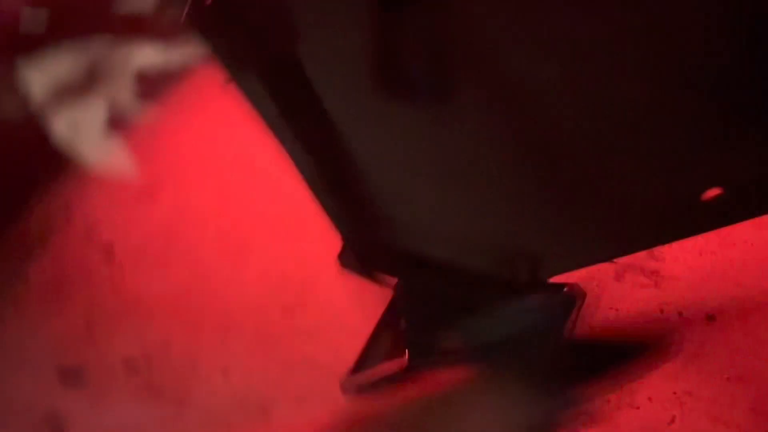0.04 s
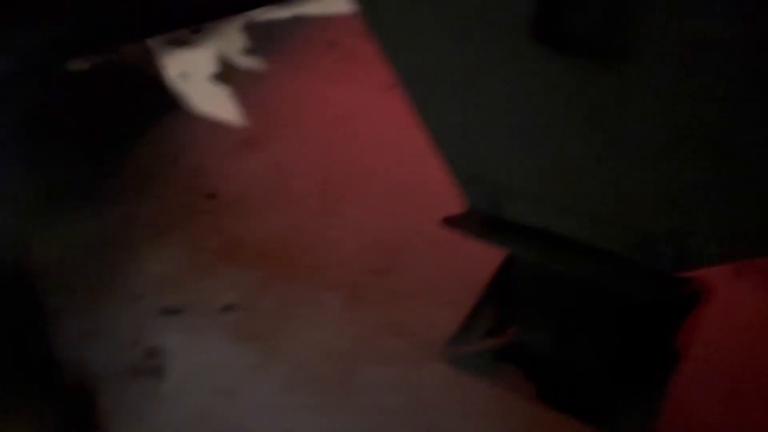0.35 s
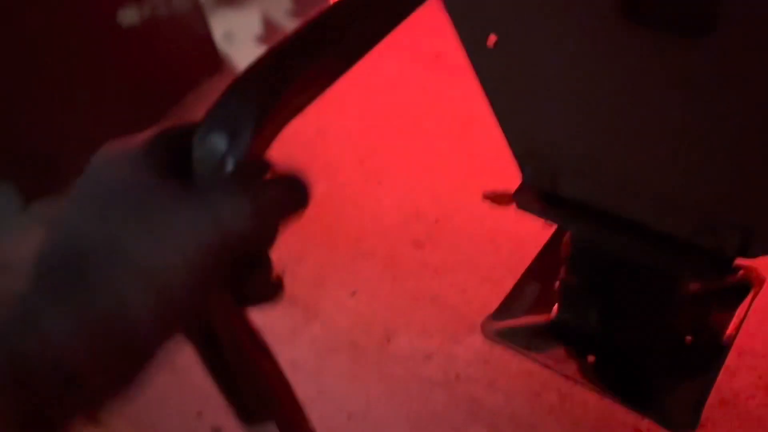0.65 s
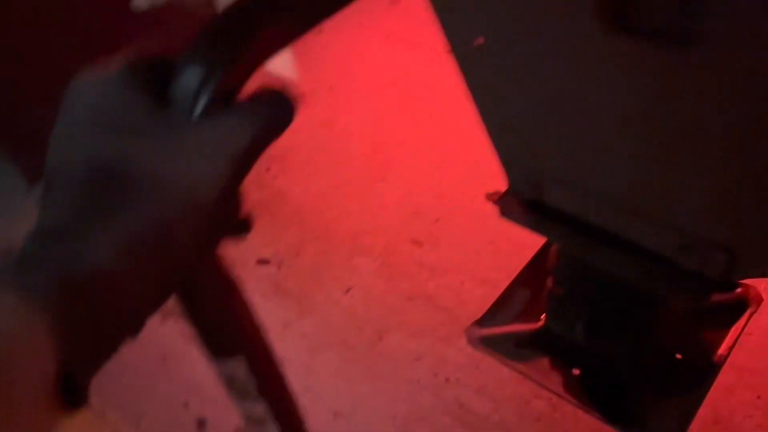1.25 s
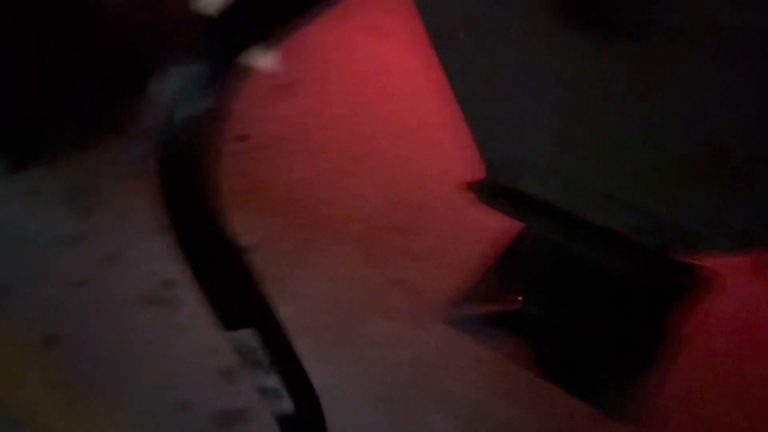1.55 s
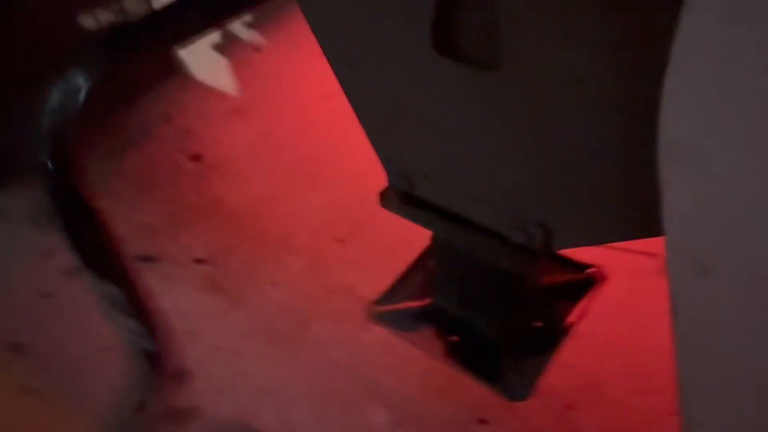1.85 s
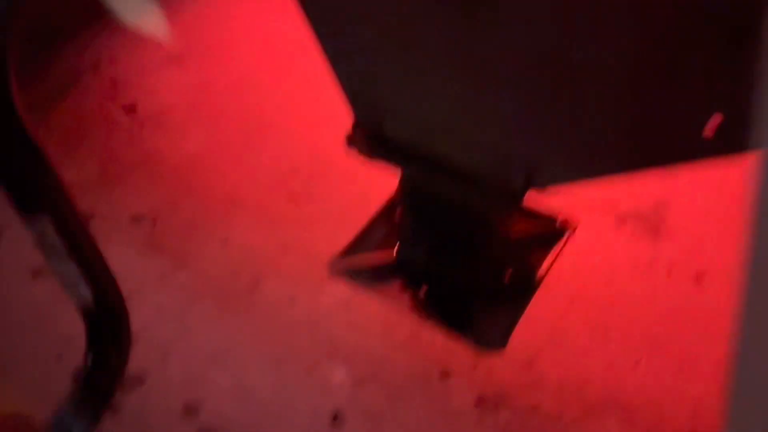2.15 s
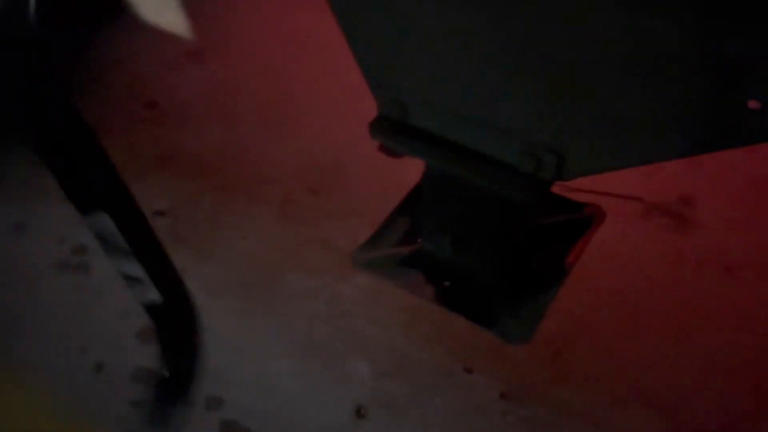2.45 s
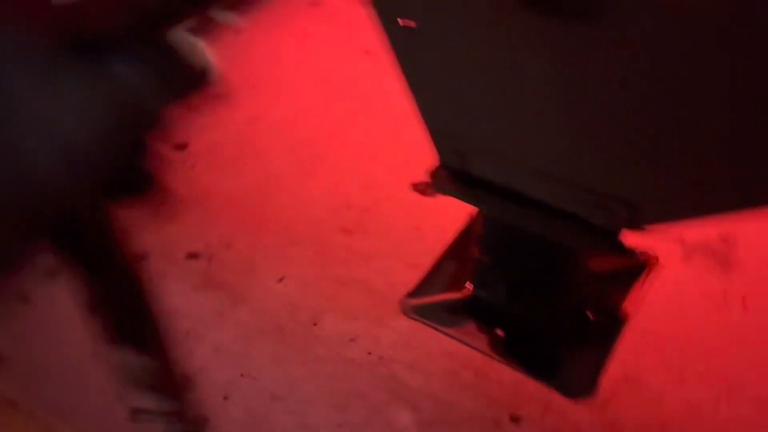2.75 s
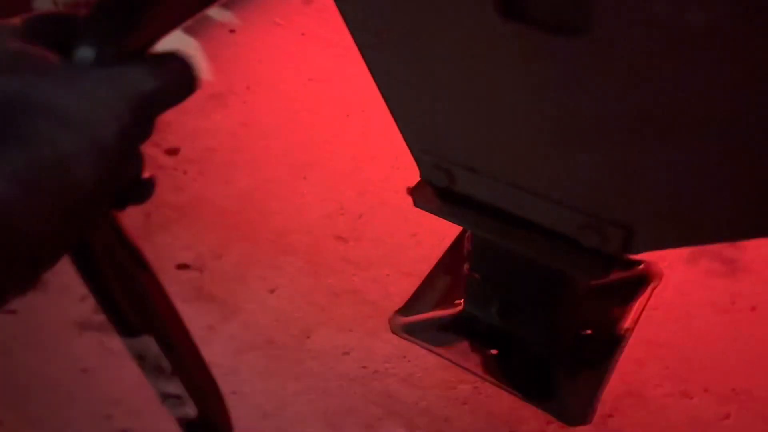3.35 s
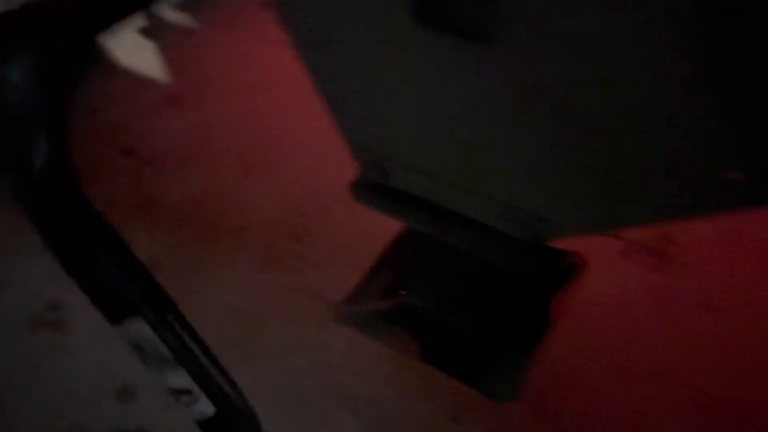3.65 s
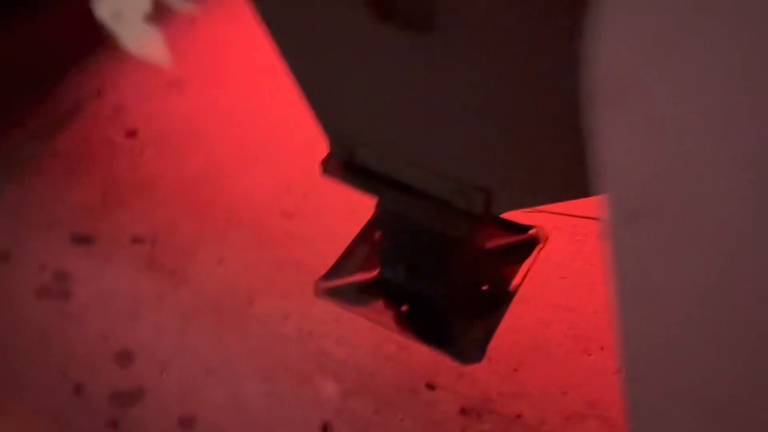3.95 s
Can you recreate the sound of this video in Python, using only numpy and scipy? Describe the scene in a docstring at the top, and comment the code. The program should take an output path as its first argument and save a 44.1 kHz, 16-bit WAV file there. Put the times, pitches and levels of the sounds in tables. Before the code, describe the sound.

Metal clanks come from a steel bar being shifted in its socket, outdoors beside a droning, idling engine. Light clinks and short scrapes lead to hard knocks, thin ringing and booming steel panels, then a hollow ring.

```python
"""An idling engine drones, its firing tones beating against its fan over a throbbing roar.
Beside it, outdoors, a steel bar with a bent handle is shifted and worked in its metal socket.
Light touches clink, sliding steel scrapes, and the bar's own modes ring thinly. Hard knocks clank
in the socket, the steel body thuds under the load, and the bar seats with a hollow ring.
A limiter ducks the whole mix after the loudest knocks."""
import sys
import numpy as np
from scipy import signal
from scipy.fft import rfft, irfft
from scipy.io import wavfile
from scipy.ndimage import uniform_filter1d

SR = 44100
rng = np.random.default_rng(int(sys.argv[2]) if len(sys.argv) > 2 else 0)


def transcribe(signal):
    """Save signal, clipped to [-1, 1], as a 16-bit WAV file at the path in sys.argv[1]."""
    frames = np.atleast_2d(signal).T
    limited = np.clip(frames, -1, 1)
    pcm = np.round(limited * 32767).astype(np.int16)
    wavfile.write(sys.argv[1], SR, pcm)


N = 176400
T = np.arange(N) / SR

# the engine's drone: firing_multiple, level_db
FIRING_TONES = [(1, -19.5), (2, -21), (3, -37), (4, -38.5), (5, -38.5), (6, -39.5), (8, -46.5)]
# the lope of uneven cylinders: firing_multiple, level_db
UNEVEN_TONES = [(.625, -48.5), (.667, -46.5), (.875, -41), (1.5, -46), (1.75, -55), (2.25, -48),
                (2.437, -59), (4.5, -39.5), (5.25, -43), (6.5, -45.5), (7.5, -47.5)]
# the fan's hum: blade_rate_multiple, level_db
FAN_TONES = [(1, -31.5), (2, -27), (3, -29.5), (4, -44.5)]
# tone curve of the machine's rumble and hiss: frequency_hz, relative_db
ROAR_EQ = [(20, -44), (33, -29), (48, -21), (65, -10.5), (88, 1.5), (112, 0), (160, 3), (195, -4.5),
           (235, -0.5), (290, -3), (380, -2.5), (470, -8.5), (700, -11.5), (950, -13.5), (1250, -17),
           (2000, -17), (3400, -23.5), (4500, -30.5), (6000, -34.5), (7300, -40), (10000, -43),
           (13000, -47.5), (15500, -52)]
# faint whines of the machine: pitch_hz, width_hz, level_db
WHINES = [(930, 76, -42.5), (1703, 5.3, -46), (1973, 45, -47.5), (2790, 7.7, -53.5)]
# light touches of the bar, split at TREBLE_HZ: start_s, low_drive_db, high_drive_db, decay_s
CLINKS = [(.309, -24.5, -33, 0.0055), (0.315, -19, -26, 0.0044), (.407, -27, -28.5, .01),
          (0.425, -26.5, -29, 0.013), (.470, -28.5, -28.5, 0.0089), (0.478, -26, -29, 0.0077),
          (.498, -34, -33, .008), (.936, -35, -26, .008), (0.945, -24.5, -21, .01), (.988, -38, -36, .01),
          (1.475, -23.5, -23.5, .005), (1.617, -23.5, -32, 0.0036), (1.735, -27, -43, 0.0043),
          (1.783, -36, -33, 0.01), (2.039, -31, -39, .005), (2.088, -40, -38, .006),
          (2.145, -22, -23.5, .003), (2.758, -29, -30, .005), (2.778, -34, -32, 0.0039),
          (2.811, -30, -26.5, 0.0054), (3.008, -30, -35, 0.015), (3.581, -19, -15.5, .004),
          (3.692, -32.5, -41, 0.0089)]
# bar resonances that every touch excites: pitch_hz, width_hz, relative_db
JINGLE_MODES = [(2755, 10, 5), (4380, 21, -4), (4820, 58, 6.5), (5500, 31, 7), (5760, 36, 11.5),
                (6050, 47, 12.7), (6290, 49, 11.2), (7200, 34, 4), (8270, 26, 11), (9230, 66, 8),
                (10120, 55, 7)]
# tone curve of the bright clinks and scrapes, with a deep filter notch near 14 kHz:
# frequency_hz, relative_db
BRIGHT_EQ = [(500, -28), (2000, -1.5), (4000, 3), (5000, 0), (5900, 3.5), (6800, -3.5), (9000, -2.5),
             (12500, -3.5), (13400, 1), (14200, -24), (15500, -4.5)]
# reverb of the steel body and nearby walls: frequency_hz, t60_s
TAIL_DECAY = [(200, 0.39), (1000, 0.29), (3000, 0.37), (6000, 0.46), (10000, 0.3), (15000, 0.13)]
# the body booms under the load: start_s, level_db
THUDS = [(0.323, -16), (0.477, -18), (1.044, -14), (1.083, -12), (1.564, -17.5), (2.633, -5), (2.685, -8),
         (3.074, -11), (3.196, -8), (3.222, -8.5), (3.256, -10), (3.649, -12)]
# low modes of the steel panels: pitch_hz, relative_db, t60_s
PANEL_MODES = [(88, -8.5, 0.32), (171.6, -10.5, 0.22), (199.3, -3, 0.15), (229.7, -3, 0.17),
               (250, 0.5, 0.13), (292.7, -4.5, 0.089), (367, -7.5, 0.13)]
# moments when the bar is free to sing: start_s, level_db
BAR_RINGS = [(.497, -48), (.95, -36), (1.011, -27), (1.48, -45), (1.56, -49), (1.735, -42), (2.6, -40),
             (3.075, -27.5), (3.192, -25.5)]
# modes of the free bar: pitch_hz, relative_db, t60_s
BAR_MODES = [(2130, -6, .2), (2810, 0, 0.26), (3390, -5.5, 0.4), (5455, -21, 0.27), (5900, -6, 0.15),
             (5900, -9, 0.18), (8200, -13, 0.27)]
# the bar's thin, high pair of modes: pitch_hz
SING_HZ = [12846, 13149]
# hard knocks: start_s, edge_drive_db, clank_drive_db, decay_s
KNOCKS = [(.875, -27.5, -19, 0.011), (.895, -34, -37, 0.0057), (1.010, -11, -10, 0.0042),
          (1.023, -34, -17, 0.0094), (1.046, -22.5, -16.5, 0.013), (1.061, -30, -27, 0.0068),
          (2.597, -6.5, -13.5, 0.0086), (2.615, -19, -13.5, 0.013), (2.633, -23, -14, 0.016),
          (2.658, -23.5, -20, 0.028), (3.039, -22.5, -17.5, 0.011), (3.065, -15.5, -36, 0.012),
          (3.075, -16.5, -16, 0.0077), (3.089, -20.5, -27.5, 0.021), (3.113, -20, -19.5, 0.015),
          (3.189, -13, -7, 0.0071), (3.219, -26.5, -17.5, 0.032), (3.582, -30, -24, 0.0064)]
# body resonances that colour the clank: pitch_hz, width_hz, relative_db
BODY_MODES = [(873, 30, -3), (1430, 88, -9), (2180, 76, -3.5), (2720, 15, -8)]
# tone curve of the clank: frequency_hz, relative_db
CLANK_EQ = [(150, -24), (400, 2), (800, 2.5), (1300, -1), (2200, -1.5), (3300, -5), (4500, -15),
            (7000, -26), (15000, -39)]
# the bar sliding in the socket: start_s, length_s, drive_db
SCRAPES = [(0.962, 0.12, -33), (1.688, 0.094, -34.5), (1.982, 0.097, -42), (2.576, 0.038, -30),
           (2.794, 0.032, -32.5), (3.168, 0.025, -31)]
# hollow modes of the socket: pitch_hz, relative_db, t60_s
SOCKET_MODES = [(672, 6, 0.49), (850, -8, 0.18), (1630, -16, 0.46), (2200, -11, 0.13)]

FIRING_HZ, BLADE_HZ = 68.34, 132.2
TREBLE_HZ = 6600
CLINK_RISE_S, STRIKE_RISE_S, GRAIN_S = 0.0024, 0.0018, 0.0015


def amp(db):
    """Decibels to gain."""
    return 10 ** (np.asarray(db) / 20)


def unit(x):
    """Scales to rms 1."""
    return x / np.sqrt(np.mean(x ** 2) + 1e-20)


def curve_at(points, hz):
    """Reads a curve on a log-frequency axis."""
    point_hz, value = np.transpose(points)
    return np.interp(np.log(hz + 1), np.log(point_hz), value)


def add(mix, start_s, sound):
    """Drops a sound into the mix at its cue."""
    part = mix[max(round(start_s * SR), 0):][:len(sound)]
    part += sound[:len(part)]


def drift(rate_hz):
    """Smooth random modulation of rms 1, rolling off above rate_hz."""
    hz = np.fft.rfftfreq(N, 1 / SR)
    return unit(irfft(rfft(rng.standard_normal(N)) / (1 + (hz / rate_hz) ** 4), N))


def equalise(x, curve):
    """Minimum-phase EQ of unit energy, which keeps attacks sharp."""
    hz = abs(np.fft.fftfreq(4096, 1 / SR))
    log_gain = np.log(amp(curve_at(curve, hz)))
    taps = np.fft.ifft(np.exp(np.conj(signal.hilbert(log_gain)))).real
    return signal.oaconvolve(x, taps / np.linalg.norm(taps))[:N]


def resonate(x, hz, width_hz):
    """One resonance of gain 1."""
    radius = np.exp(-np.pi * width_hz / SR)
    return 2 * signal.lfilter([1 - radius], [1, -radius * np.exp(2j * np.pi * hz / SR)], x).real


def tones(table, cycles, waver_db, scatter):
    """Tones at multiples of one rotation; without phase scatter they line up as pulses."""
    out = np.zeros(N)
    for multiple, db in table:
        peak = np.sqrt(2) * amp(db + waver_db * drift(4))
        out += peak * np.cos(2 * np.pi * (multiple * cycles + scatter * rng.random()))
    return out


def engine():
    """Firing pulses, uneven cylinders, fan tones, faint whines and a roar that throbs with the firing."""
    firing = np.cumsum(FIRING_HZ * (1 + 0.00067 * drift(2.7))) / SR
    blades = np.cumsum(BLADE_HZ * (1 + 0.00089 * drift(5.2))) / SR
    drone = tones(FIRING_TONES, firing, waver_db=0, scatter=0)
    lope = tones(UNEVEN_TONES, firing, waver_db=1.5, scatter=0.99)
    fan = tones(FAN_TONES, blades, waver_db=1.5, scatter=0.9)
    throb = 1 + 0.05 * np.cos(2 * np.pi * firing)
    flutter = amp(1.35 * drift(20.7))
    roar = amp(-23.5) * unit(equalise(rng.standard_normal(N) * throb * flutter, ROAR_EQ))
    whines = np.zeros(N)
    for hz, width_hz, db in WHINES:
        band = resonate(rng.standard_normal(N), hz, width_hz)
        whines += amp(db) * unit(resonate(band, hz, width_hz))
    return drone + lope + fan + roar + whines


def hit_power(hits, rise_s):
    """Power envelope of hits (start_s, level_db, decay_s): quick attack, short hold, decay."""
    power, t = np.zeros(N), np.arange(SR // 2) / SR
    attack = np.minimum(t / rise_s, 1)
    for start_s, db, decay_s in hits:
        decay = np.exp(-np.maximum(t - 2 * rise_s, 0) / decay_s)
        add(power, start_s, (amp(db) * attack * decay) ** 2)
    return power


def chatter(power, grain_db, grain_s):
    """Steel on steel: clumps of tiny contacts that follow a power envelope."""
    noise = rng.standard_normal(N)
    clumps = amp(grain_db * np.clip(drift(1 / grain_s), -2, 2))
    return np.sqrt(power) * unit(noise * clumps)


def clinks():
    """Light touches and the bright edges of hard knocks: bursts of chatter in two bands."""
    edges = hit_power([(s, db, decay) for s, db, _, decay in KNOCKS], STRIKE_RISE_S)
    lows = hit_power([(s, db, decay) for s, db, _, decay in CLINKS], CLINK_RISE_S)
    highs = hit_power([(s, db, decay) for s, _, db, decay in CLINKS], CLINK_RISE_S)
    out = np.zeros(N)
    for side, power in [("low", lows), ("high", highs)]:
        crossover = signal.butter(4, TREBLE_HZ, side, fs=SR, output="sos")
        out += signal.sosfilt(crossover, chatter(edges + power, grain_db=3, grain_s=GRAIN_S))
    return out


def contact_spots(touch, spot_count=10, mode_count=26, hold_s=0.008, t60_s=0.056):
    """The point of contact wanders; each spot rings briefly with its own cluster of high modes."""
    t = np.arange(SR // 8) / SR
    active_spot = rng.integers(0, spot_count, N)[(T / hold_s).astype(int)]
    ringing = np.zeros(N)
    for spot in range(spot_count):
        hz = rng.uniform(2500, 15500, (mode_count, 1))
        partials = np.sin(2 * np.pi * (hz * t + rng.random((mode_count, 1))))
        cluster = partials.sum(0) * amp(-60 * t / t60_s)
        ringing += signal.oaconvolve(touch * (active_spot == spot), cluster / np.linalg.norm(cluster))[:N]
    wet = amp(-2)
    return (touch + wet * ringing) / np.hypot(1, wet)


def shimmer(touch):
    """Every touch rings its contact spot and sets the bar jingling; a bright, notched EQ follows."""
    jingle = sum(amp(db) * resonate(touch, hz, width_hz) for hz, width_hz, db in JINGLE_MODES)
    return equalise(contact_spots(touch) + amp(-7) * jingle, BRIGHT_EQ)


def tail(x):
    """Diffuse reverb of the steel body and nearby walls, each band dying at its own speed."""
    hz, t, bands = signal.stft(rng.standard_normal(SR), SR, nperseg=256)
    decay = amp(-60 * t / curve_at(TAIL_DECAY, hz)[:, None])
    impulse = signal.istft(bands * decay, SR, nperseg=256)[1]
    return signal.fftconvolve(x, impulse / np.linalg.norm(impulse))[:N]


def strike(modes, cues, rise_s):
    """Rings a set of modes at each cue (start_s, level_db), struck a little differently each time."""
    out, t = np.zeros(N), np.arange(SR * 3 // 4) / SR
    attack = np.minimum(t / rise_s, 1)
    for start_s, level_db in cues:
        for hz, db, t60_s in modes:
            envelope = attack * amp(level_db + db + rng.standard_normal() - 60 * t / t60_s)
            add(out, start_s, envelope * np.sin(2 * np.pi * (hz * t + rng.random())))
    return out


def panel_thuds():
    """The steel panels boom under the load, low and with a soft attack."""
    return strike(PANEL_MODES, THUDS, rise_s=0.01)


def bar_ring():
    """The free bar sings in its own modes, with a thin, high pair on top."""
    high_pair = [(hz, db, 0.3) for hz, db in zip(SING_HZ, (3, -2))]
    return strike(BAR_MODES + high_pair, BAR_RINGS, STRIKE_RISE_S)


def clanks():
    """Hard knocks in the socket: midrange chatter that rings the body's resonances."""
    power = hit_power([(s, db, decay) for s, _, db, decay in KNOCKS], STRIKE_RISE_S)
    clank = equalise(chatter(power, grain_db=-0.5, grain_s=GRAIN_S), CLANK_EQ)
    body = sum(amp(db) * resonate(clank, hz, width_hz) for hz, width_hz, db in BODY_MODES)
    return amp(-1.5) * (clank + body)


def scrapes():
    """The bar slides in the socket: short swells of coarser chatter."""
    power = np.zeros(N)
    for start_s, length_s, db in SCRAPES:
        swell = np.sin(np.linspace(0, np.pi, round(length_s * SR))).clip(0)
        add(power, start_s, amp(db) ** 2 * swell)
    return chatter(power, grain_db=4, grain_s=0.0043)


def socket_ring(start_s=3.192, level_db=-21.5):
    """The bar seats and leaves the socket ringing hollow."""
    return strike(SOCKET_MODES, [(start_s, level_db)], STRIKE_RISE_S)


def scene():
    """Engine bed, a bright and a heavy steel layer with their tails, and the ringing bar, in mono."""
    bright = shimmer(clinks() + scrapes())
    heavy = clanks() + panel_thuds() + socket_ring()
    bed = engine()
    reverb = amp(-10) * tail(bright) + amp(-3.5) * tail(heavy)
    return (bed + bright + heavy + reverb + bar_ring())[None]


def record(dry, threshold_db=-9, release_db_per_s=11, ceiling=0.78, cutoff_hz=15750):
    """A limiter ducks quickly and recovers slowly; a hard clip and a steep low-pass follow."""
    level_db = 10 * np.log10(abs(uniform_filter1d(dry[0] ** 2, size=220)) + 1e-12)
    release_db = T * release_db_per_s
    held_db = np.maximum.accumulate(level_db + release_db) - release_db  # each peak sinks steadily
    duck_db = uniform_filter1d(np.maximum(held_db - threshold_db, 0), size=100)
    limited = np.clip(dry * amp(-duck_db), -ceiling, ceiling)
    lowpass = signal.firwin(401, cutoff_hz, window=("kaiser", 8), fs=SR)
    return signal.oaconvolve(limited, lowpass[None], "same")


dry = scene()
out = record(dry)
transcribe(out)
```